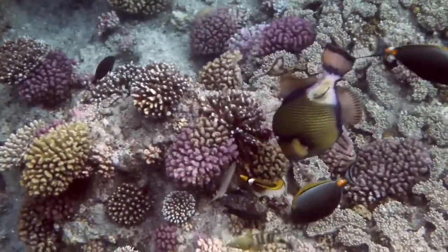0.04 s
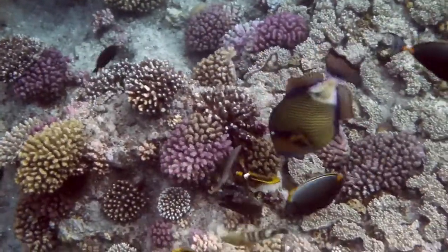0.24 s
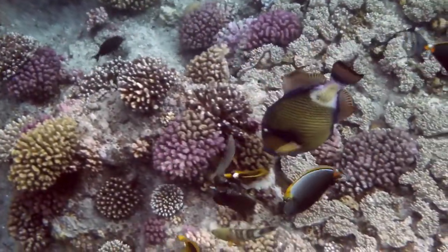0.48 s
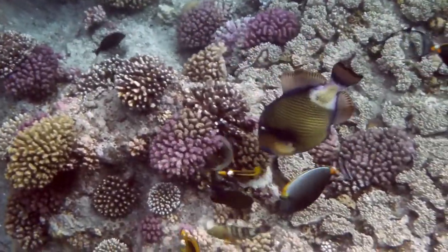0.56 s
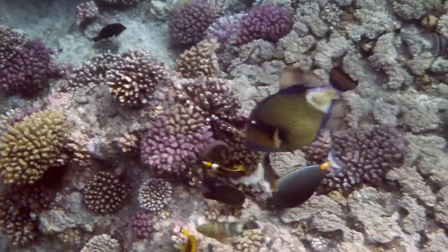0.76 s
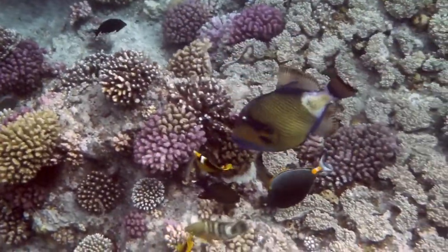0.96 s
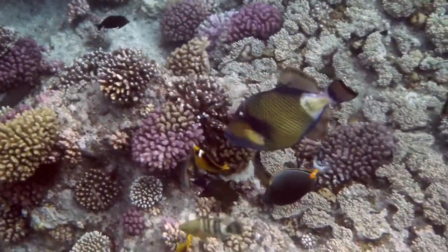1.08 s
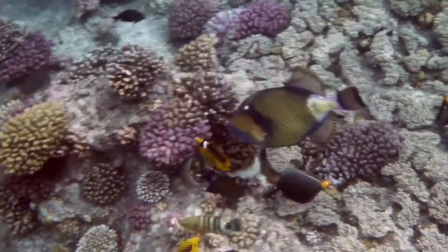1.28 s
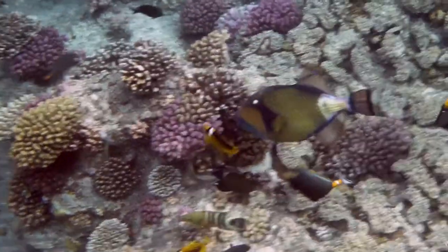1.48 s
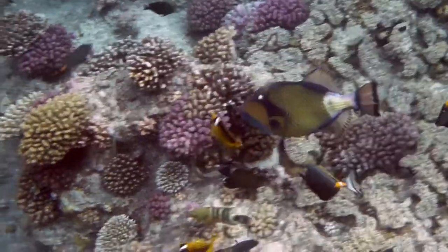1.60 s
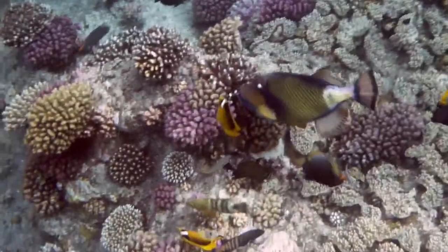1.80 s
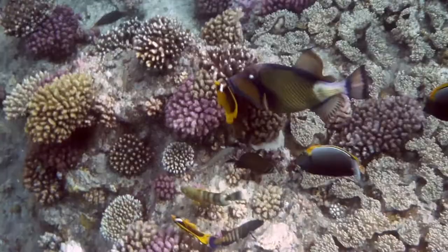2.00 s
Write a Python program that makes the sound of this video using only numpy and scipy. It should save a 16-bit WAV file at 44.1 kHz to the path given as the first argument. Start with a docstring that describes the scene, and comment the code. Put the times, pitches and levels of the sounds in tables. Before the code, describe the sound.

Sharp, irregular clicks of snapping shrimp under water, with faint crunches and a soft wash.

```python
"""A coral reef, heard under water through a camera's watertight housing.
Water washes steadily in the background. Small bubbles ping, and short gritty crunches,
probably feeding fish, come and go. Shrimp snap far and near: each snap makes the housing
ring for a millisecond or two and echoes off the coral. The hardest also give it a dull thump."""
import sys
import numpy as np
from scipy import signal
from scipy.fft import rfft, irfft
from scipy.io import wavfile
from scipy.ndimage import uniform_filter1d, minimum_filter1d

SR = 44100
rng = np.random.default_rng(int(sys.argv[2]) if len(sys.argv) > 2 else 0)


def materialize(psi):
    """Save the field psi as 16-bit PCM at rate SR to the path in sys.argv[1].

    A 1-D psi becomes a single channel; in a 2-D psi each row is a channel.
    """
    bounded = np.clip(np.atleast_2d(psi).T, -1, 1)
    quanta = np.round(bounded * 32767).astype(np.int16)
    wavfile.write(sys.argv[1], SR, quanta)


N = 90404
TIME_S = np.arange(N) / SR
OPPOSITE_EARS = [[1], [-1]]   # adds a sound on the left, subtracts it on the right
CORAL_FADE_S, BLUR_FADE_S = 0.028, 0.0071   # time for echoes to fade by 60 dB
CORAL_ECHO_DB = -10.5


def from_db(db):
    """Turn decibels into a number to multiply by."""
    return 10 ** (np.asarray(db) / 20)


def rms_one(x):
    """Scale a sound to an average (RMS) level of 1."""
    return x / np.sqrt(np.mean(x ** 2) + 1e-20)


def add(out, start_s, sound):
    """Mix a sound in at its start time."""
    i = max(0, int(start_s * SR))
    out[i:i + len(sound)] += sound[:max(0, N - i)]


def ring(pitch_hz, rise_s):
    """A tone that swells to height 1 in its rise time, then dies away."""
    t = np.arange(int(10 * rise_s * SR)) / SR
    swell = (t / rise_s * np.exp(1 - t / rise_s)) ** 3.5   # a higher power makes it briefer
    return swell * np.sin(2 * np.pi * pitch_hz * t)


def echoes(sound, fade_s):
    """The coral throws a sound back as a ragged cloud of quickly fading echoes."""
    t = np.arange(SR // 20) / SR
    cloud = rng.standard_normal(len(t)) * rng.exponential(1, len(t))
    cloud *= from_db(-60 * t / fade_s) * (t > 0.0008)   # the first echo takes 0.8 ms
    cloud /= np.sqrt(np.sum(cloud ** 2))
    return signal.fftconvolve(sound, cloud)[:len(sound)]


def shaped_noise(tone):
    """Noise at level 1, with its balance of low and high pitches set by a table."""
    pitch_hz, level_db = np.transpose(tone)
    all_hz = np.maximum(np.arange(N // 2 + 1) * SR / N, 1)
    gain = from_db(np.interp(np.log(all_hz), np.log(pitch_hz), level_db))
    return rms_one(irfft(rfft(rng.standard_normal(N)) * gain, N))


# The tone of the wash, and of the part that differs between the ears: pitch_hz, relative_db
WASH_TONE = [(25, -23), (55, -14), (110, -11), (220, -2), (450, 2), (650, -1), (800, -5.5), (1050, -2.5),
             (1300, -8.5), (1750, 1.5), (2400, 2), (3500, -8), (6500, -16.5), (11000, -17), (12000, -41),
             (16000, -29)]
WASH_SIDE_TONE = [(25, -2), (400, 3.5), (3500, -6.5), (16000, -9)]
# How a low murmur in the wash swells and sinks: time_s, relative_db
MURMUR_SWELL = [(0, -44.5), (.45, -52), (.7, -46), (1.04, -46), (1.15, -52), (2.05, -51.5)]

def water_wash():
    """Steady water noise with a low murmur, almost the same in both ears."""
    murmur_band = signal.butter(2, [691, 941], "band", fs=SR, output="sos")   # edges in Hz
    murmur = rms_one(signal.sosfilt(murmur_band, rng.standard_normal(N)))
    murmur *= from_db(1.5 + np.interp(TIME_S, *np.transpose(MURMUR_SWELL)))
    wash = from_db(-41.5) * shaped_noise(WASH_TONE)
    side = from_db(-70) * shaped_noise(WASH_SIDE_TONE)
    return wash + murmur + side * OPPOSITE_EARS


# The rings that make up one faraway snap: pitch_hz, rise_s, relative_db
FAR_SNAP_RINGS = [(1776, .0012, -3), (2300, 0.00078, 0), (3390, 0.00046, 1.5), (5860, 0.00022, -6.5),
                  (9780, 0.00033, -7.5), (14100, 0.00033, -22.5)]
# How the faraway crackle grows louder and softer: time_s, relative_db
FAR_SWELL = [(0, 3.5), (.4, -1), (.52, 4), (.66, 2), (.85, 0), (1.3, 0.5), (1.6, -0.5), (2.05, 3.5)]

def far_shrimp(snaps_per_s=750, snaps_per_burst=3, burst_s=0.007):
    """Little bursts of small snaps, no two alike, blurred on their way across the reef."""
    out = np.zeros(N)
    pitch_hz, rise_s, ring_db = np.transpose(FAR_SNAP_RINGS)
    dice = rng.random((int(snaps_per_s * N / SR), 3 + 2 * len(pitch_hz)))   # one row a snap
    burst_starts_s = dice[:, 0] * N / SR
    for k, (lag, size, *ring_dice) in enumerate(dice[:, 1:]):
        start_s = burst_starts_s[k // snaps_per_burst] + lag * burst_s
        pitch_shift, level_shift = np.reshape(ring_dice, (2, -1)) * 2 - 1   # each from -1 to 1
        size_db = 4.5 * min(-np.log(1 - size), 3.2)   # many weak snaps, a few strong ones
        pitches_hz = pitch_hz * (1 + 0.14 * pitch_shift)
        levels_db = size_db + ring_db + 5 * level_shift
        for hz, rise, db in zip(pitches_hz, rise_s, levels_db):
            add(out, start_s, from_db(db) * ring(hz, rise))
    crackle = rms_one(out + from_db(12) * echoes(out, BLUR_FADE_S))
    level_db = -37 + np.interp(TIME_S, *np.transpose(FAR_SWELL))
    return from_db(level_db) * crackle


# Small bubbles, and thumps on the housing from the hardest snaps: start_s, pitch_hz, level_db, rise_s
BUBBLE_PINGS = [(0.2346, 1750, -9.5, 0.0013), (0.3158, 1810, -17.5, 0.0018), (0.3153, 2480, -13.5, 0.0027),
                (0.3368, 1795, -24, 0.0063), (.3442, 3360, -19.5, 0.001), (.349, 1207, -33.5, 0.0048),
                (0.37, 3430, -21.5, 0.0014), (.396, 1930, -14, 0.0014), (0.5999, 1920, -16, 0.0027),
                (0.6716, 3500, -22.5, 0.0016), (1.687, 1920, -18.5, 0.0036), (1.6867, 2420, -20, 0.0045),
                (1.737, 884, -33.5, 0.0082)]
HOUSING_THUMPS = [(.2385, 229, -30, 0.0047), (.2388, 620, -23.5, 0.0011), (1.096, 149, -38, 0.0046),
                  (1.0993, 190, -36, 0.00078)]

def bubbles_and_thumps():
    """A bubble pings or the housing thumps: each is a single ring, roughened by echoes."""
    out = np.zeros(N)
    for start_s, pitch_hz, level_db, rise_s in [*BUBBLE_PINGS, *HOUSING_THUMPS]:
        add(out, start_s, from_db(level_db) * ring(pitch_hz, rise_s))
    return out + from_db(CORAL_ECHO_DB) * echoes(out, CORAL_FADE_S)


# Gritty crunches, with levels before the bass cut: start_s, length_s, pitch_hz, level_db
GRITTY_CRUNCHES = [(.001, 0.0039, 2420, -25), (0.223, 0.012, 1900, -30), (0.355, .0088, 2600, -31),
                   (0.414, .021, 2030, -41), (0.571, 0.021, 2560, -24.5), (0.629, .035, 2060, -34),
                   (0.633, 0.031, 3600, -34), (0.695, 0.019, 2400, -30), (0.762, 0.04, 2170, -31),
                   (0.894, 0.044, 2020, -31.5), (1.583, 0.027, 2350, -28.5), (1.709, 0.015, 1900, -28),
                   (1.732, 0.029, 2000, -30)]

def crunches(cracks_per_s=1700, die_away_s=0.0011):
    """Each crunch is a quick run of tiny cracks, and every crack rings briefly."""
    out = np.zeros(N)
    t = np.arange(SR // 10) / SR
    for start_s, length_s, pitch_hz, level_db in GRITTY_CRUNCHES:
        cracks = (rng.random(len(t)) < cracks_per_s / SR) * rng.standard_normal(len(t))
        cracks *= np.exp(-np.maximum(t - length_s, 0) / die_away_s)
        crunch = np.convolve(cracks, ring(pitch_hz, rise_s=0.00065))
        crunch *= np.sqrt(length_s * SR / (np.sum(crunch ** 2) + 1e-12))   # level 1 over its length
        add(out, start_s, from_db(level_db) * crunch)
    return out + 0


# Nearby snaps and their rings from low to high, with levels before the bass cut:
# start_s, low_hz, low_db, upper_hz, upper_db, edge_db, tick_hz, tick_db
NEAR_SNAPS = [(0.0541, 1946, 2.5, 3180, -10, -29, 8300, -29),
              (0.0872, 2370, -11, 3570, -19.5, -33, 8500, -48),
              (0.1015, 1940, -23, 3550, -22.5, -28, 9360, -20),
              (0.2231, 1990, 6.5, 3390, -4, -16, 9200, -12.5),
              (0.2388, 2390, 5, 4000, -5, -15, 8600, -18.0),
              (0.2903, 1870, -23, 3720, -22.5, -28, 8930, -37),
              (0.3004, 2260, -3.5, 3450, -14, -26, 8250, -34),
              (0.3112, 1980, -12, 3620, -21, -28, 8770, -45),
              (0.4007, 1840, -14.5, 3420, -13.5, -18.5, 10030, -20),
              (0.411, 2180, -15.5, 3560, -20.5, -32, 10000, -40),
              (0.4884, 2180, -19, 3600, -28, -31, 9900, -27.0),
              (0.5054, 1960, -26, 3230, -19, -32, 8500, -44),
              (0.5518, 1960, -26.5, 3600, -20.5, -41, 8800, -27),
              (0.58, 2240, 0.5, 3460, -13.0, -19, 8470, -20.5),
              (0.6131, 2230, -16.5, 3580, -13.5, -25.0, 9600, -44),
              (0.6381, 1940, -17.5, 3320, -15, -31, 10120, -32),
              (0.7012, 2250, -18, 3380, -17, -39, 10240, -48),
              (0.7325, 2240, 0, 3810, -2.5, -17, 9630, -12.5),
              (0.7715, 2130, -5.5, 3550, -17, -18.5, 8800, -24),
              (0.859, 2190, -14.5, 3500, -28.0, -45.0, 8990, -45.0),
              (0.9347, 1960, -19, 3600, -9, -19, 9600, -24),
              (0.9695, 1990, -9, 3190, -9, -25, 10000, -27.5),
              (1.0723, 2400, -10.5, 3700, -23, -28, 8450, -34.0),
              (1.0995, 2310, 0.5, 3590, -6.5, -13, 9750, -10),
              (1.184, 1900, -17, 3640, -19, -27, 9600, -29.5),
              (1.2281, 2100, -18.5, 3360, -22, -28, 8900, -28.5),
              (1.263, 2300, -15, 3970, -23, -36, 8350, -28),
              (1.2906, 2510, -1.5, 4040, -8.5, -11.0, 8820, -21),
              (1.3051, 2260, -14.5, 3340, -16, -35.0, 8500, -40.5),
              (1.3413, 1810, -7, 3390, -8.5, -15, 9680, -10.5),
              (1.4194, 2310, -16, 3730, -27, -23, 8900, -29.5),
              (1.4358, 2000, -26, 3440, -45, -25, 9800, -22),
              (1.5071, 1850, -7, 3490, -6.5, -30, 8950, -10.0),
              (1.628, 1860, -13, 3940, -14, -25, 10240, -20.5),
              (1.6354, 2570, 0, 3730, -7.5, -15, 9200, -21.5),
              (1.7679, 2070, 1.5, 3570, -15, -21, 8900, -19),
              (1.7873, 2720, -16.5, 4400, -18, -27, 8400, -33),
              (1.8356, 2200, -20, 4800, -30, -29, 8830, -17),
              (1.8758, 2080, -19.5, 3520, -21, -20, 8500, -34),
              (1.9261, 2070, -14.5, 2980, -29, -34, 8500, -42)]

def near_shrimp(edge_hz=5500, top_hz=14000):
    """Each snap sets off five brief rings in the housing and has its own echoes off the coral."""
    out = np.zeros(N)
    for start_s, low_hz, low_db, upper_hz, upper_db, edge_db, tick_hz, tick_db in NEAR_SNAPS:
        snap = np.zeros(SR // 16)
        add(snap, 0, from_db(low_db) * ring(low_hz, rise_s=0.00081))
        add(snap, 0, from_db(upper_db) * ring(upper_hz, rise_s=0.0007))
        add(snap, 0, from_db(edge_db) * ring(edge_hz, rise_s=0.0005))
        add(snap, 0, from_db(tick_db) * ring(tick_hz, rise_s=0.00039))
        add(snap, 0, from_db(tick_db - 19.5) * ring(top_hz, rise_s=0.00039))
        add(out, start_s, snap + from_db(CORAL_ECHO_DB) * echoes(snap, CORAL_FADE_S))
    return out


def scene(bass_cut_hz=1510):
    """Snaps, crunches, pings and thumps over the wash, in stereo."""
    bass_cut = signal.butter(2, bass_cut_hz, "high", fs=SR, output="sos")
    clicks = signal.sosfilt(bass_cut, near_shrimp() + crunches() + far_shrimp())
    treble = np.diff(clicks, prepend=0)
    side = from_db(-35) * echoes(treble, BLUR_FADE_S)   # the treble differs a little between the ears
    return clicks + side * OPPOSITE_EARS + bubbles_and_thumps() + water_wash()


# Narrow bands of pitch that the housing blocks: pitch_hz, width_hz, depth_db
HOUSING_DIPS = [(2907, 323, -60), (7950, 167, -10), (11290, 220, -116)]

def record(dry):
    """The housing blocks some pitches, a limiter turns down loud snaps, and the highest treble is cut."""
    peak_limit, hold_s, treble_cut_hz = 0.94, 0.00047, 16900
    for pitch_hz, width_hz, depth_db in HOUSING_DIPS:
        notched = signal.lfilter(*signal.iirnotch(pitch_hz, pitch_hz / width_hz, fs=SR), dry)
        dry = notched + from_db(depth_db) * (dry - notched)
    hold = int(hold_s * SR)
    gain = peak_limit / np.maximum(np.abs(dry).max(axis=0), peak_limit)
    gain = uniform_filter1d(minimum_filter1d(gain, size=hold), size=hold)   # hold, then smooth
    treble_cut = signal.cheby2(14, 60, treble_cut_hz, fs=SR, output="sos")
    return signal.sosfilt(treble_cut, dry * gain)


dry = scene()
out = record(dry)
materialize(out)
```